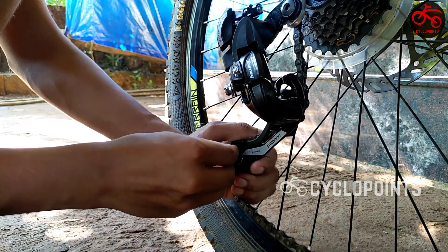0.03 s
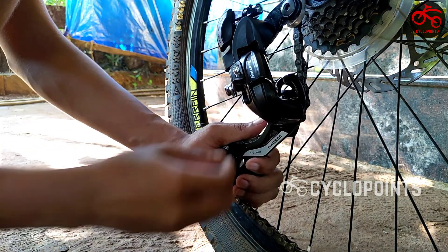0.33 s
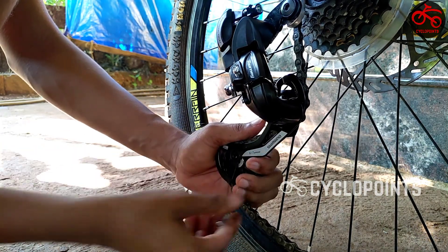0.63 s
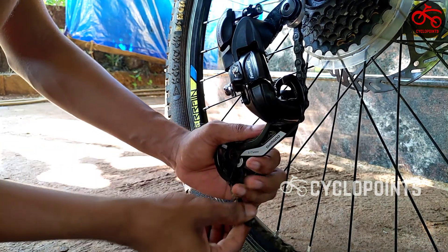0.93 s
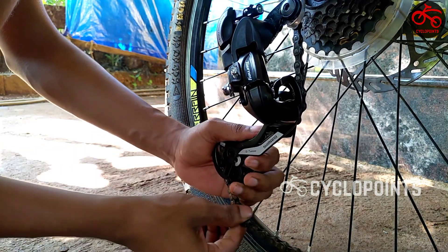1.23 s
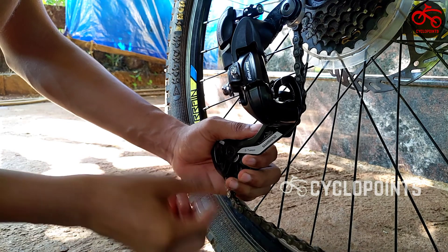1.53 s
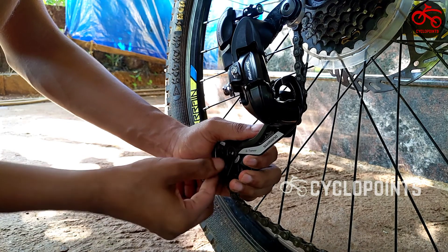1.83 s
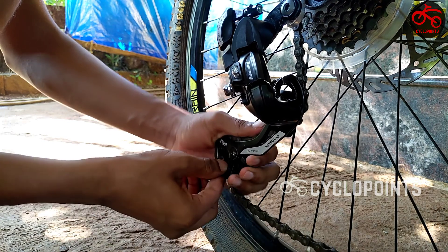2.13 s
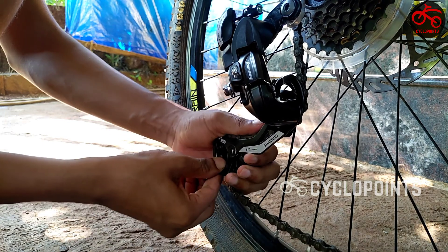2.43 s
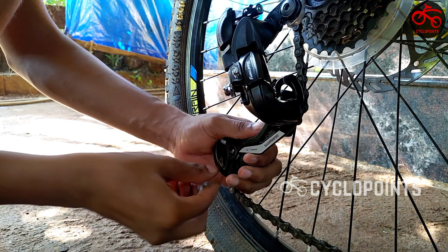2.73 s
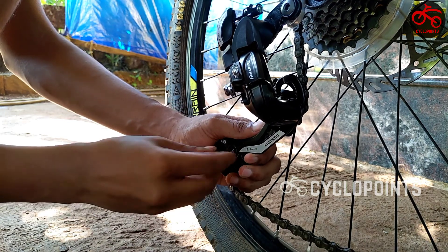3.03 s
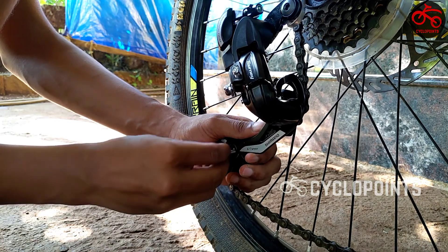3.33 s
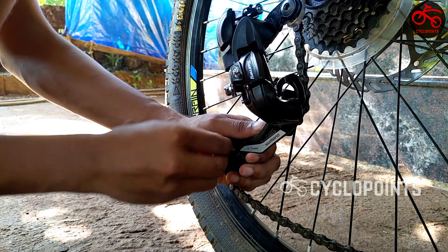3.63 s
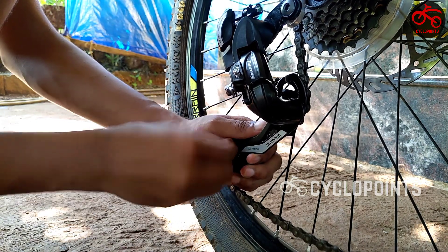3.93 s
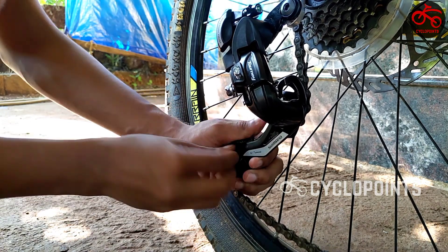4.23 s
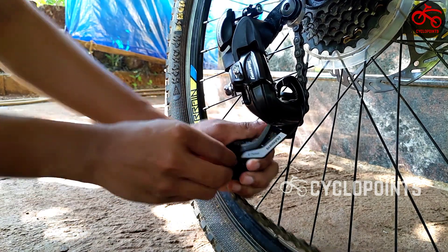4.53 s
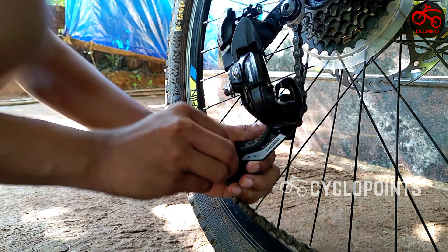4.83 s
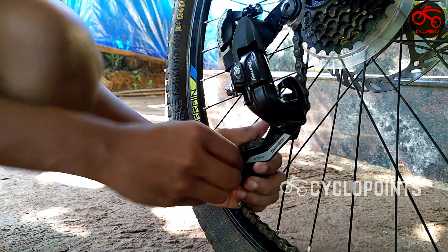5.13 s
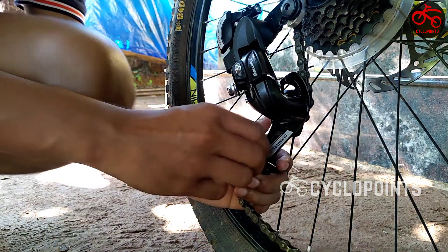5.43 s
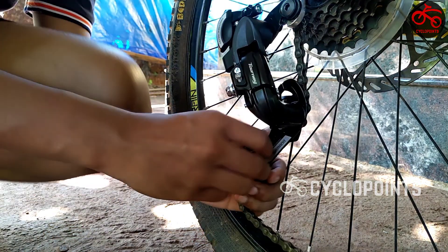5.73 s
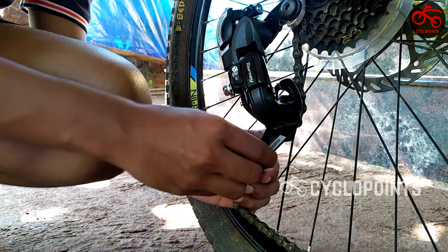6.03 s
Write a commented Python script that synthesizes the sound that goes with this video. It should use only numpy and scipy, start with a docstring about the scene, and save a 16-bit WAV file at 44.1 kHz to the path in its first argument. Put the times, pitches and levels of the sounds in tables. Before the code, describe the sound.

In a quiet yard, birds chirp over the faint rumble of distant traffic and a far engine. Hands work on a bicycle derailleur close to the microphone, making a few soft ticks, knocks and rubs. Past the middle, the parts strike with one loud, sharp clack. Around it a shoe scrapes over gritty concrete in four short strokes, the last the loudest, with small stones snapping underneath.

```python
"""A walled yard, where a mechanic crouches at a bicycle's derailleur. Under his hands the parts tick, knock
and rub, and once they strike with a sharp clack. Around that moment he shifts his weight: a sole scrapes
over gritty concrete in four short strokes, its friction a stream of tiny fractures, and stones snap
under it. Birds whistle in the trees over the rumble of distant traffic and the drone of a far engine;
the walls reflect the near sounds faintly."""
import sys
import numpy as np
from scipy import signal
from scipy.fft import rfft, irfft, next_fast_len
from scipy.io import wavfile
from scipy.ndimage import map_coordinates

SR = 44100
rng = np.random.default_rng(int(sys.argv[2]) if len(sys.argv) > 2 else 0)


def materialize(psi):
    """Save the field psi as 16-bit PCM at rate SR to the path in sys.argv[1].

    A 1-D psi becomes a single channel; in a 2-D psi each row is a channel.
    """
    bounded = np.clip(np.atleast_2d(psi).T, -1, 1)
    quanta = np.round(bounded * 32767).astype(np.int16)
    wavfile.write(sys.argv[1], SR, quanta)


N = 267731


def amp(db):
    """Amplitude ratio of a level in decibels."""
    return 10 ** (np.asarray(db) / 20)


def unit(x):
    """Normalisation to an rms of 1."""
    return x / np.sqrt(np.mean(x ** 2) + 1e-20)


def along(points, hz):
    """Interpolation of (Hz, value) points on a logarithmic frequency axis."""
    freqs, values = np.transpose(points)
    return np.interp(np.log(hz + 1), np.log(freqs + 1), values)


def wobble(rate):
    """Smooth random modulation through rate knots a second."""
    knots = rng.standard_normal(int(N * rate / SR) + 4)
    return map_coordinates(knots, [np.arange(N) * rate / SR])


def filtered(x, response):
    """Linear filtering: the spectrum of x is multiplied by a frequency response."""
    size = next_fast_len(len(x) + SR // 4)
    return irfft(rfft(x, size) * response(np.fft.rfftfreq(size, 1 / SR)), size)[:len(x)]


def coloured(x, spectrum):
    """Spectral shaping of x by (Hz, dB) points, at an rms of 1."""
    return unit(filtered(x, lambda hz: amp(along(spectrum, hz))))


def resonance(f, hz, width_hz):
    """Band-pass response of a damped oscillator at the frequencies f."""
    return 1j * f * width_hz / (hz * hz - f * f + 1j * f * width_hz)


def resonate(x, modes):
    """Modal superposition: x drives (Hz, width in Hz, dB) modes, neighbours in opposite phase."""
    return filtered(x, lambda f: sum((-1) ** k * amp(db) * resonance(f, hz, width_hz)
                                     for k, (hz, width_hz, db) in enumerate(modes)))


def compact_pulse(spectrum, size=2048):
    """Minimum phase gives the most compact pulse that has a (Hz, dB) spectrum."""
    cepstrum = irfft(np.log(amp(along(spectrum, np.fft.rfftfreq(size, 1 / SR)))))
    cepstrum[1:size // 2] *= 2
    cepstrum[size // 2 + 1:] = 0
    return irfft(np.exp(rfft(cepstrum)))


def burst(t60, size=4096):
    """Exponential decay: the noise of one contact falls 60 dB in t60 seconds."""
    return rng.standard_normal(size) * amp(-60 * np.arange(size) / SR / t60)


def snap(hz, width_hz, t60):
    """Resonant filtering: contact noise passes three times through one broad resonance."""
    return filtered(burst(t60), lambda f: resonance(f, hz, width_hz) ** 3)


def grains(rate, spread_db):
    """Shot noise: rate tiny impulses a second on average, many small and a few large."""
    chance, size, sign = rng.random(N), rng.standard_normal(N), rng.choice([-1, 1], N)
    return (chance < rate / SR) * sign * amp(spread_db * size)


def add(track, start, sound, peak_db):
    """Superposition: a sound joins the track at a start in seconds, scaled to a peak level."""
    part = track[max(round(start * SR), 0):][:len(sound)]
    part += (amp(peak_db) * sound / np.abs(sound).max())[:len(part)]


def echo(x, decay, delay):
    """Diffuse reverberation: scattered reflections die away as the (Hz, t60 in seconds) points set."""
    hz, t, spectra = signal.stft(rng.standard_normal(SR // 2), SR, nperseg=256)
    tail = signal.istft(spectra * amp(-60 * t / along(decay, hz)[:, None]), SR, nperseg=256)[1]
    delayed = np.pad(x, (round(delay * SR), 0))
    return signal.fftconvolve(delayed, tail / np.linalg.norm(tail))[:N]


def traffic():
    """Broadband noise of far traffic: a rumble and a soft wash; the background drops after the clack and creeps
    back."""
    # Each row of both spectra: frequency in Hz, relative level in dB.
    rumble_spectrum = [(15, -12.5), (30, -6.5), (46, 4), (62, -4), (95, -9), (145, -13.5), (200, -20),
                       (300, -30), (600, -47.5)]
    wash_spectrum = [(100, -12.5), (220, -1), (350, 1), (500, 0.5), (800, -5), (1400, -8), (2300, -16.5),
                     (4000, -21), (7500, -33.5), (9000, -18)]
    dip_start_s, fall_s, depth_db, recovery_db_per_s = 4.45, 0.43, -6, 2.5
    since = np.arange(N) / SR - dip_start_s
    fall_db = depth_db * np.clip(since / fall_s, 0, 1)
    recovery_db = recovery_db_per_s * np.maximum(since - fall_s, 0)
    rumble = amp(-48 + 0.24 * wobble(2.3)) * coloured(rng.standard_normal(N), rumble_spectrum)
    wash = amp(-60 + 2.0 * wobble(12)) * coloured(rng.standard_normal(N), wash_spectrum)
    return amp(np.minimum(fall_db + recovery_db, 0)) * (rumble + wash)


def engine():
    """Harmonic series of a far engine: only its lowest orders carry, wavering in the air."""
    # Each row: time in seconds, firing rate in Hz, level in dB.
    course = [(0, 47.75, -64), (0.4, 49.1, -58.5), (1.1, 49.58, -64.5), (2.2, 44.96, -65.5),
              (3, 44.36, -74), (6.07, 44.94, -80)]
    # Each row: multiple of the firing rate, relative level in dB.
    orders = [(1, 3), (2, -1.5), (3, 0.5), (4, -1)]
    t = np.arange(N) / SR
    times, rates_hz, levels_db = np.transpose(course)
    firing_hz = np.interp(t, times, rates_hz) * (1 + 0.011 * wobble(9))
    phase = 2 * np.pi * np.cumsum(firing_hz) / SR
    drone = sum(amp(db + 2.9 * wobble(8)) * np.sin(k * phase) for k, db in orders)
    return amp(np.interp(t, times, levels_db)) * drone


def whistle(start, length, first_hz, last_hz, db, blur_hz):
    """Frequency modulation: a note swells and fades, sliding ever slower, hoarse with pitch jitter."""
    out, t = np.zeros(N), np.arange(N) / SR
    on = (t > start) & (t < start + length)
    progress = (t[on] - start) / length
    hz = last_hz + (first_hz - last_hz) * (1 - progress) ** 1.6 + blur_hz * wobble(700)[on]
    out[on] = amp(db) * np.sin(np.pi * progress) * np.sin(2 * np.pi * np.cumsum(hz) / SR)
    return out


def birds():
    """Gliding tones of birds: long falls, short chirps and twittering, smeared by scattering in trees."""
    # Each row: start in seconds, length in seconds, first pitch in Hz, level in dB.
    falls = [(0.103, 0.45, 5200, -68), (1.65, .25, 4490, -70.5), (2.961, .22, 4190, -67.5)]
    # Each row: start in seconds, length in seconds, first and last pitch in Hz, level in dB.
    chirps = [(-0.03, 0.088, 2890, 3000, -61.5), (0.526, .11, 1730, 2670, -50),
              (0.686, 0.071, 1803, 2690, -52.5), (0.744, .063, 2854, 3048, -42.5),
              (2.007, .08, 2880, 3450, -69), (2.121, .08, 3300, 3370, -65),
              (3.311, 0.077, 3270, 3510, -63.5), (3.421, 0.073, 3380, 3650, -62),
              (3.578, 0.071, 2840, 3096, -59), (3.635, .075, 3722, 2764, -58.5),
              (5.241, 0.065, 2780, 2905, -67)]
    # Each row: frequency in Hz, reverberation time of the trees in seconds.
    tree_decay = [(1000, 0.28), (5000, 0.42)]
    song, nearest_db = np.zeros(N), max(row[-1] for row in chirps)
    for start, length, first_hz, db in falls:
        song += whistle(start, length, first_hz, last_hz=2860, db=db, blur_hz=164)
    for start, length, first_hz, last_hz, db in chirps:
        blur_hz = 38 * 2 ** ((nearest_db - db) / 10)  # fainter chirps cross more foliage
        song += whistle(start, length, first_hz, last_hz, db, blur_hz)
    song += twitter(count=4)
    return amp(-0.5) * song + amp(-2.5) * echo(song, tree_decay, delay=0.014)


def handling():
    """Damped impacts: steel parts tick lightly; hands and feet knock with a brief ring and a dry puff."""
    # Each row: start in seconds, level in dB, pitch in Hz.
    ticks = [(0.3387, -51, 4100), (1.5567, -52.5, 7080), (2.1246, -55, 4360), (2.5838, -55, 4610),
             (3.4053, -41.5, 4540), (3.5226, -52, 4460), (3.8217, -47, 5700), (4.548, -40, 6800)]
    # Each row: start in seconds, level in dB, pitch in Hz, 60 dB decay time in seconds.
    knocks = [(0.994, -42.5, 1735, 0.05), (0.997, -44, 844, .025), (1.316, -52.5, 1690, 0.029),
              (3.925, -45, 1082, 0.083), (4.466, -32, 148, .025), (4.6, -33, 205, 0.039),
              (4.651, -34, 106, 0.059), (4.668, -29.5, 448, 0.059), (5.293, -25, 520, .013),
              (5.296, -29, 820, 0.011), (5.35, -32, 580, 0.044), (5.412, -29.5, 597, 0.054),
              (5.489, -31, 301, .09), (5.492, -21.5, 724, 0.045), (5.697, -41, 554, 0.018)]
    out, t = np.zeros(N), np.arange(SR // 8) / SR
    for start, db, hz in ticks:
        add(out, start, snap(hz, 0.77 * hz, t60=0.055), db - 1)
    attack = (1 - np.exp(-t / 0.0008)) ** 4
    for start, db, hz, t60 in knocks:
        ring = attack * np.sin(2 * np.pi * hz * t) * amp(-60 * t / t60)
        add(out, start, ring, db - 4)
        add(out, start, snap(hz, 0.62 * hz, t60), db - 1.5)
    return out


def rustles():
    """Sliding friction: a sleeve brushes and rubs, giving soft, short swells of band-limited noise."""
    # Each row: centre in seconds, Gaussian width in seconds, level in dB, pitch in Hz.
    rubs = [(1.79, 0.05, -61.5, 396), (3.29, 0.057, -57.5, 347), (4.07, 0.04, -69, 4500),
            (4.588, 0.007, -51.5, 6560)]
    out, t = np.zeros(N), np.arange(N) / SR
    for centre, width, db, hz in rubs:
        band = [(hz, 0.56 * hz, 0)]
        slips = grains(rate=4300, spread_db=0.5)
        friction = unit(resonate(resonate(slips, band), band))
        out += amp(db) * np.exp(-((t - centre) / width) ** 2 / 2) * friction
    return out


def twitter(count):
    """Spectral broadening: strong pitch jitter blurs a few far, loosely spaced rising notes."""
    from_s, until_s, note_s, pitch_hz, level_db = 2.15, 3.0, 0.091, 4030, -71.5
    out = np.zeros(N)
    for k, (late, louder, higher) in enumerate(rng.uniform(-1, 1, (count, 3))):
        hz = pitch_hz * (1 + 0.08 * higher)
        start = from_s + (until_s - from_s) * (k + 0.3 + 0.2 * late) / count
        out += whistle(start, note_s, 0.88 * hz, hz, level_db + 2 * louder, blur_hz=350)
    return out


def under_sole(x, gap_hz, sharpness):
    """High-pass radiation: the gap under the sole radiates mainly above its moving resonance."""
    hz, t, spectra = signal.stft(x, SR, nperseg=256)
    ratio = hz[:, None] / np.interp(t, np.arange(N) / SR, gap_hz)
    gain = ratio ** 2 / np.abs(1 - ratio ** 2 + 1j * ratio / sharpness)
    return signal.istft(spectra * gain ** 2, SR, nperseg=256)[1][:N]


def scuffs():
    """Friction under load: a sole presses, holds and eases off, driving grit, sand and juddering rubber."""
    # Each row: start, start and end of full weight, and lift-off in seconds; grinding level in dB;
    # first touch, sand and rubber in dB relative to it; gap resonance at full weight in Hz.
    strokes = [(3.903, 3.911, 3.95, 3.965, -44, -5.5, 10, -10, 2180),
               (4.59, 4.668, 4.737, 4.84, -28.5, -6.5, -.5, -10, 2000),
               (5.331, 5.363, 5.368, 5.407, -32.5, -15.5, -1, -3.5, 2154),
               (5.408, 5.435, 5.495, 5.727, -24.3, -8.5, -3, -17.5, 882)]
    # Each row of the three spectra: frequency in Hz, relative level in dB.
    grit_spectrum = [(500, -13.5), (1400, -0.5), (1800, -3.5), (2250, 0.5), (2700, -4), (3100, 0.5),
                     (3400, -5.5), (4200, 3.5), (4700, -13), (5600, -25.5), (8000, -48)]
    sand_spectrum = [(2500, -44), (4000, -13), (4700, 1), (5700, -1.5), (6500, 1), (7500, 1.5), (9000, -12)]
    rubber_spectrum = [(30, 5.5), (90, -8.5), (160, -7.5), (260, -1), (450, 9), (750, 5.5), (1200, 7),
                       (2000, -22.5), (4000, -44.5)]
    bite_s, lift_s, ease_db, open_gap_hz = 0.006, 0.014, -25, 2150.0
    t = np.arange(N) / SR
    grit_gain, sand_gain, rubber_gain = np.zeros((3, N))
    gap_hz = np.full(N, open_gap_hz)
    for start, full, until, end, db, touch_db, sand_db, rubber_db, flat_hz in strokes:
        contact = np.clip((t - start) / bite_s, 0, 1) * np.clip(1 - (t - end) / lift_s, 0, 1) ** 2
        press_db = np.interp(t, [start, full], [touch_db, 0])
        weight_db = press_db + ease_db * np.interp(t, [until, end], [0, 1]) ** 0.86
        swept_db = np.interp(t, [start, end], [0, -5.5])  # the stroke sweeps sand away
        grit_gain += contact * amp(db + weight_db)
        sand_gain += contact * amp(db + weight_db + sand_db + swept_db)
        rubber_gain += contact * amp(db + rubber_db + 1.5 * weight_db)
        gap_hz *= (flat_hz / open_gap_hz) ** (contact * amp(0.6 * weight_db))  # weight flattens the gap
    grit = coloured(grains(rate=9000, spread_db=2), grit_spectrum)
    grit = unit(under_sole(grit, gap_hz, sharpness=1.32))
    sand = coloured(grains(rate=7000, spread_db=1), sand_spectrum)
    rubber = coloured(grains(rate=2700, spread_db=3.5), rubber_spectrum)
    judder, slip = amp(1.7 * wobble(220)), amp(1.5 * wobble(70))
    return judder * (grit_gain * grit + sand_gain * sand) + slip * rubber_gain * rubber


def stones():
    """Brittle fracture: larger grains snap under the sole, each at its own broad pitch."""
    # Each row: start in seconds, peak level in dB, pitch in Hz.
    fractures = [(3.904, -24.5, 6000), (3.912, -26, 6000), (4.596, -20.5, 3400), (4.6927, -15.5, 3700),
                 (4.7315, -18.5, 3620), (4.737, -15, 5600), (5.4226, -13, 4000), (5.495, -11, 4600),
                 (5.5588, -17.5, 1690), (5.5716, -14.5, 3020), (5.627, -33, 2299), (5.699, -31, 2400)]
    out = np.zeros(N)
    for start, db, hz in fractures:
        add(out, start, snap(hz, 1.5 * hz, t60=0.018), db)
    return out


def clack():
    """Impact on a well damped body: one push, a short hollow ring of modes, and loose parts chattering."""
    # A light touch, then the blow. Each row: start in seconds, level in dB.
    strikes = [(4.4661, -15), (4.4694, 1.0)]
    # Each row: mode frequency in Hz, bandwidth in Hz, relative level in dB.
    modes = [(490, 64, 4.5), (1209, 120, -10), (2230, 62, -9.5), (2894, 170, -2), (3000, 89, -6),
             (3680, 200, -1.5), (4100, 110, -8), (4480, 110, -20), (4700, 160, -11), (5375, 80, -21.5),
             (5900, 92, -27.5), (6700, 480, -16.5)]
    # Each row: frequency in Hz, relative level in dB.
    push_spectrum = [(30, 3.5), (120, -0.5), (300, -7.5), (500, -1), (800, -6), (1050, -5), (1550, 2),
                     (2050, -13.5), (2650, -3), (3600, -7), (4100, -17.5), (5000, -18.5), (7500, -28),
                     (12000, -52.5)]
    push = compact_pulse(push_spectrum)
    t = np.arange(len(push)) / SR
    damping = amp(-60 * t / 0.045)
    ring = resonate(signal.unit_impulse(len(t)), modes) * damping
    rattle = burst(t60=0.026, size=len(t)) * (1 - np.exp(-t / 0.001))
    chatter = np.convolve(push, rattle)[:len(t)]
    blow = unit(ring) + amp(-1.5) * unit(push) + amp(-6.5) * unit(chatter)
    out = np.zeros(N)
    for start, db in strikes:
        add(out, start, blow, db - 1)
    return out


def scene():
    """Superposition of the near sounds, their faint reflections from the walls, birds and traffic."""
    # Each row: frequency in Hz, reverberation time of the yard in seconds.
    yard_decay = [(200, 0.13), (1500, 0.19), (4000, 0.19), (9000, .08)]
    near = scuffs() + stones() + clack() + handling() + rustles()
    reflections = amp(-22) * echo(near, yard_decay, delay=0.016)
    return (near + reflections + birds() + traffic() + engine())[None]


def record(dry):
    """Band limiting and saturation: a phone keeps little above 8 kHz, rounds off peaks and adds hiss."""
    # Each row of both curves: frequency in Hz, relative level in dB.
    microphone_response = [(7600, 0), (7850, -5), (8050, -10.5), (8350, -16.5), (8550, -42.5), (9000, -71)]
    hiss_spectrum = [(100, 3), (8500, -2.5), (11000, -3.5), (15000, -3)]
    top_hz = 15500
    sound = filtered(dry[0], lambda hz: amp(along(microphone_response, hz)))
    rounded = sound / (1 + sound ** 8) ** (1 / 8)
    hiss = amp(-83.5) * coloured(rng.standard_normal(N), hiss_spectrum)
    return filtered(rounded + hiss, lambda hz: hz < top_hz)[None]


dry = scene()
out = record(dry)
materialize(out)
```